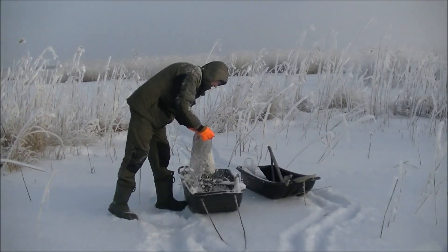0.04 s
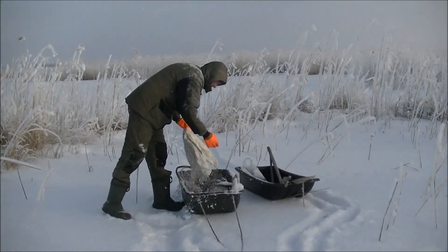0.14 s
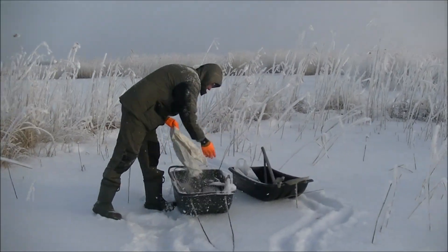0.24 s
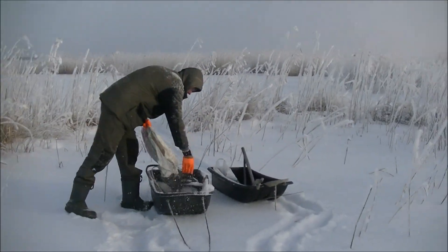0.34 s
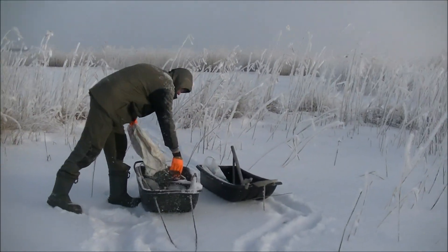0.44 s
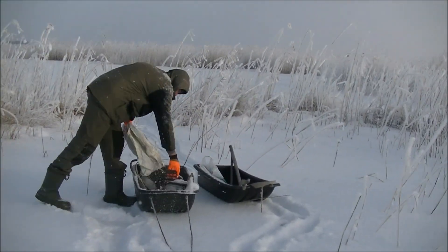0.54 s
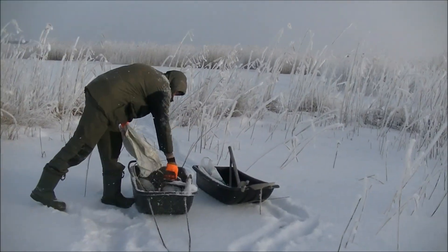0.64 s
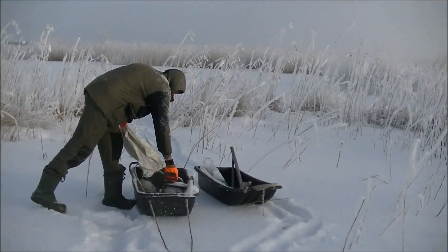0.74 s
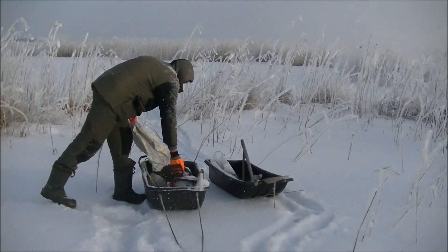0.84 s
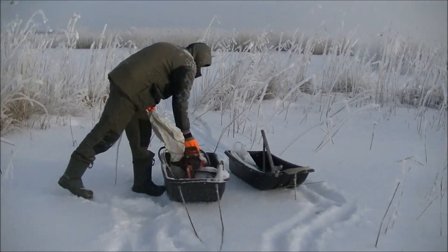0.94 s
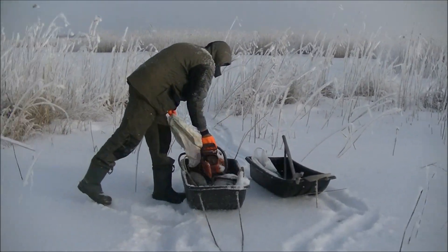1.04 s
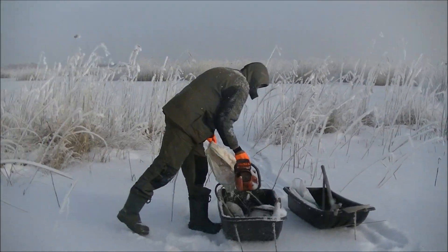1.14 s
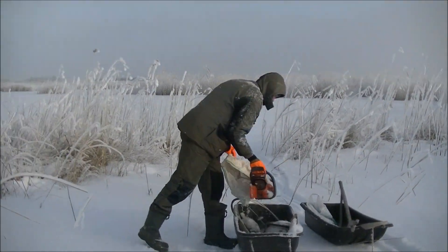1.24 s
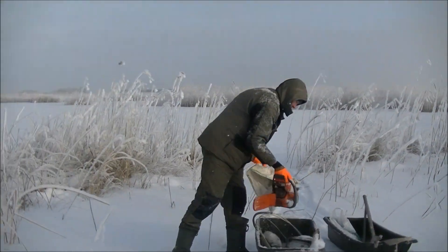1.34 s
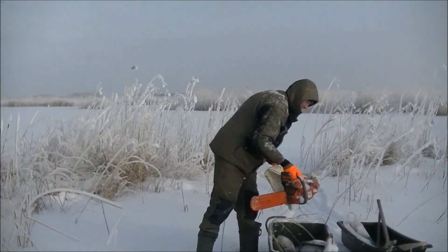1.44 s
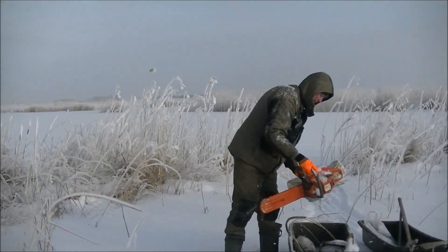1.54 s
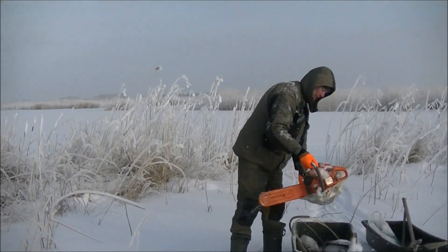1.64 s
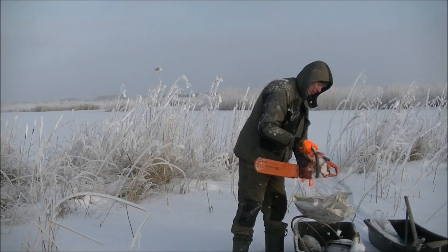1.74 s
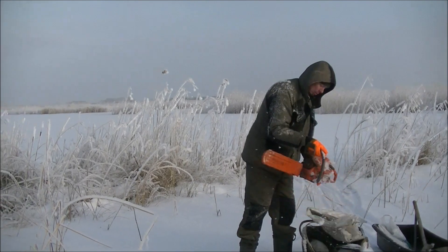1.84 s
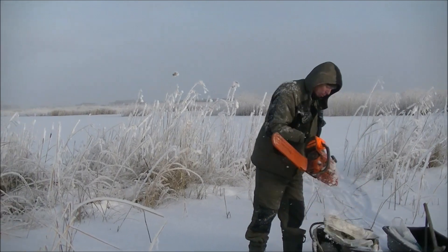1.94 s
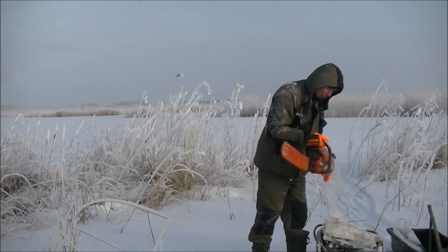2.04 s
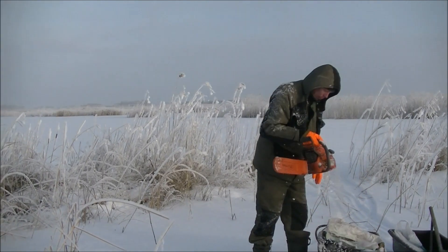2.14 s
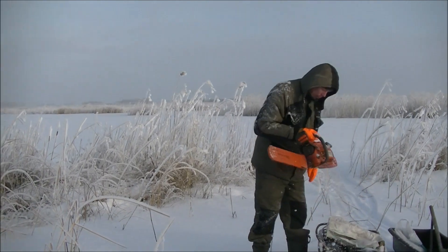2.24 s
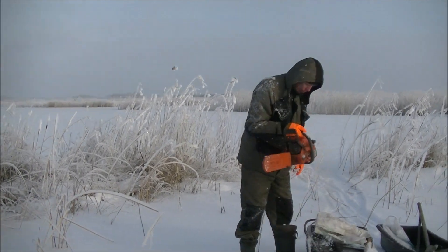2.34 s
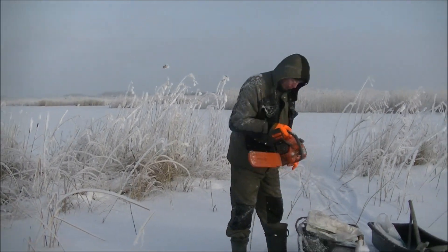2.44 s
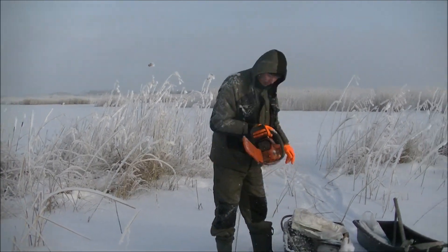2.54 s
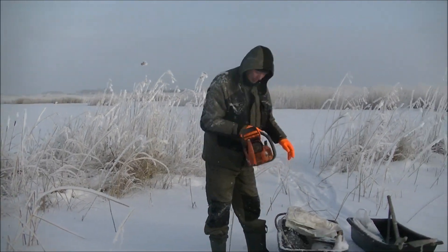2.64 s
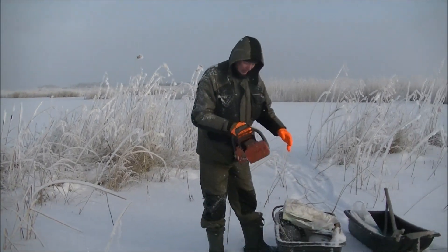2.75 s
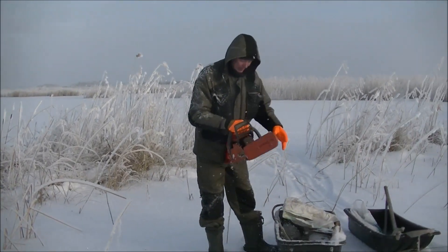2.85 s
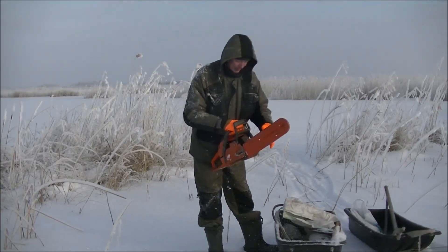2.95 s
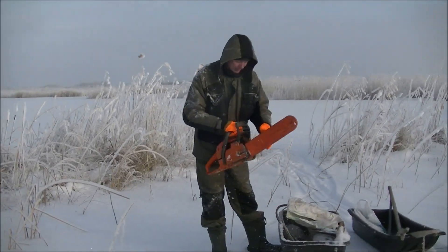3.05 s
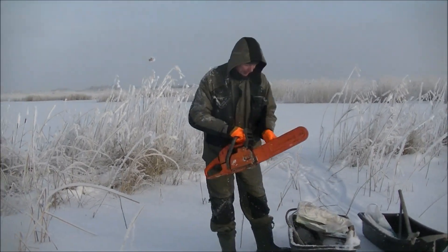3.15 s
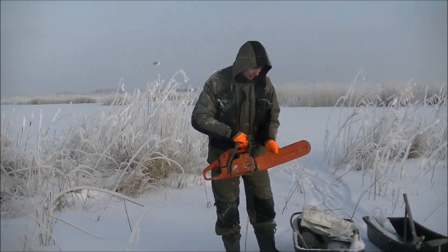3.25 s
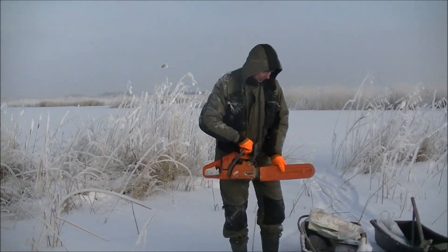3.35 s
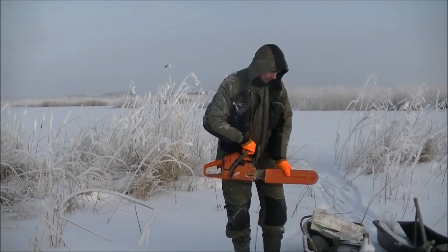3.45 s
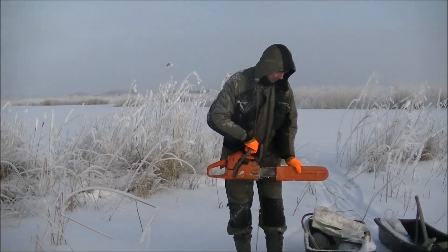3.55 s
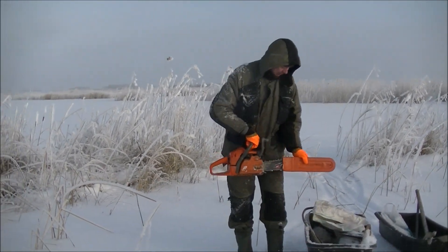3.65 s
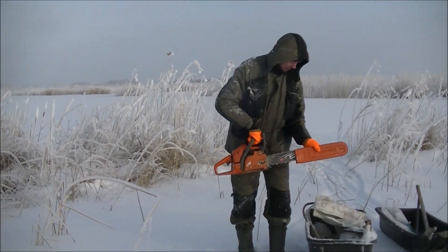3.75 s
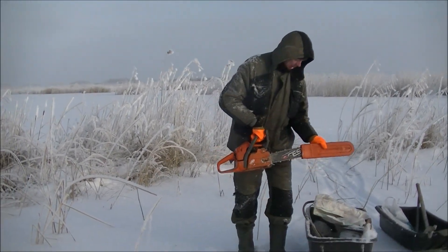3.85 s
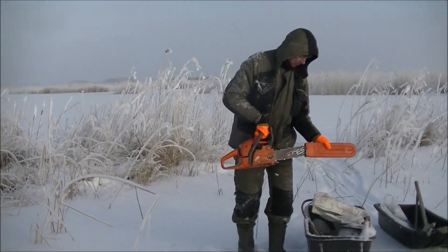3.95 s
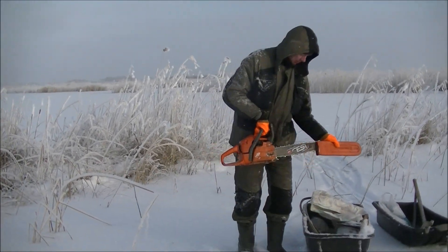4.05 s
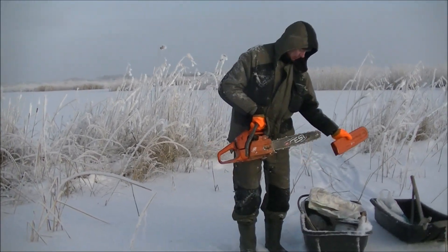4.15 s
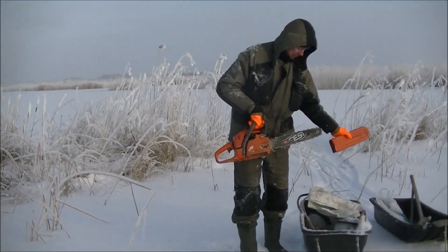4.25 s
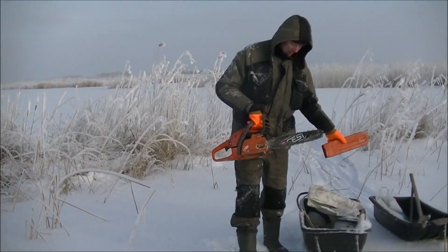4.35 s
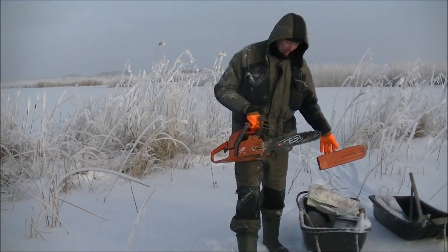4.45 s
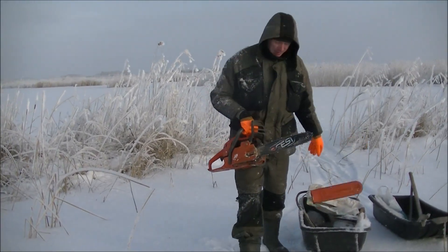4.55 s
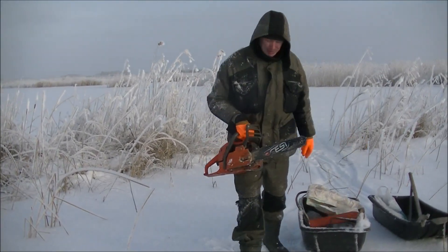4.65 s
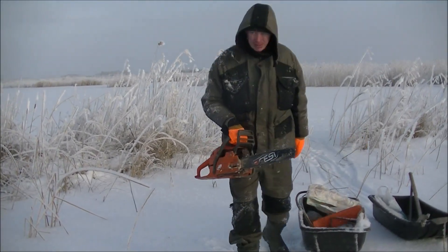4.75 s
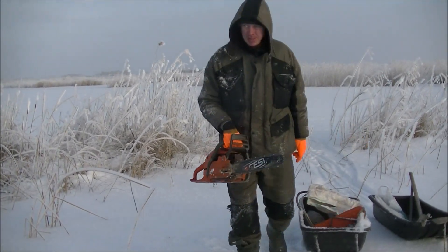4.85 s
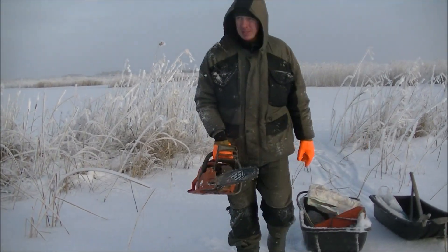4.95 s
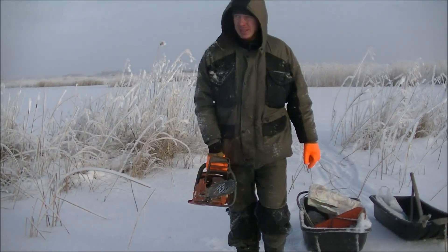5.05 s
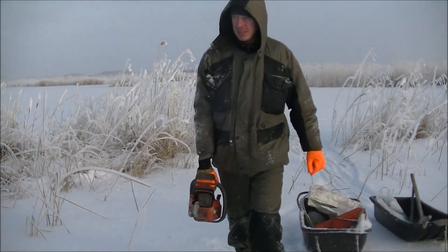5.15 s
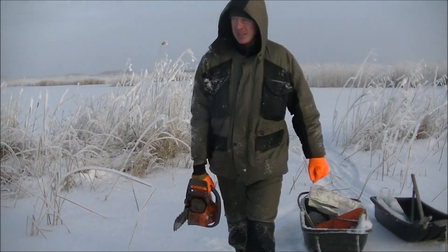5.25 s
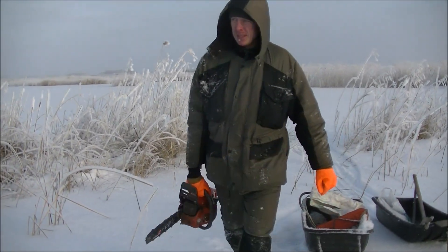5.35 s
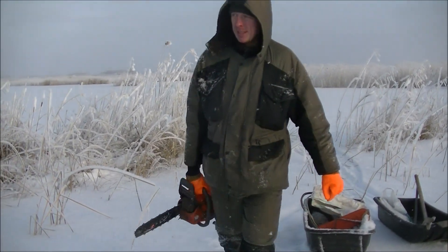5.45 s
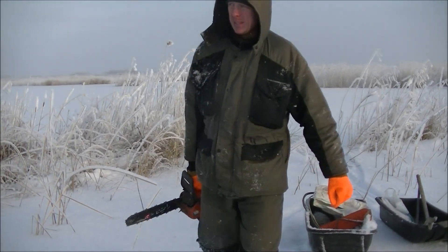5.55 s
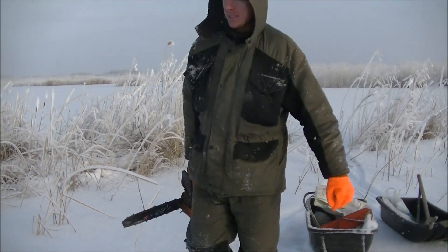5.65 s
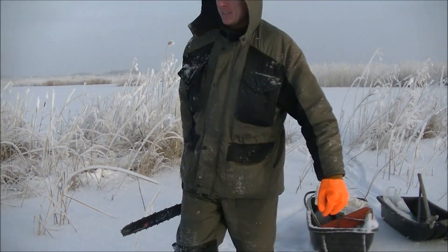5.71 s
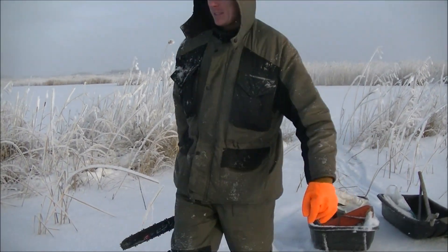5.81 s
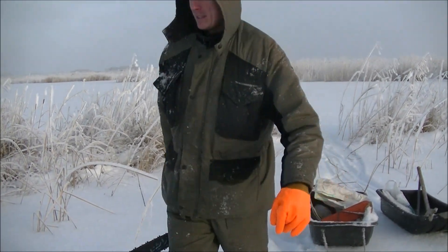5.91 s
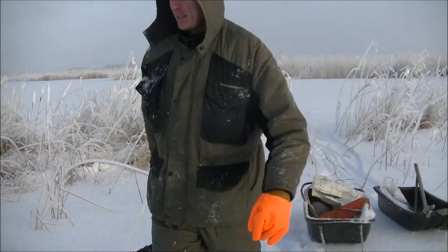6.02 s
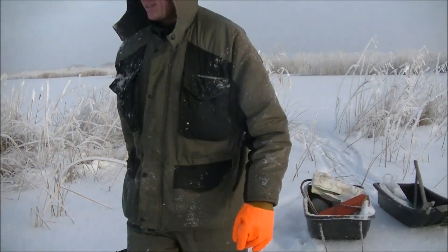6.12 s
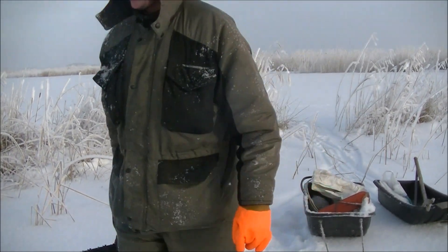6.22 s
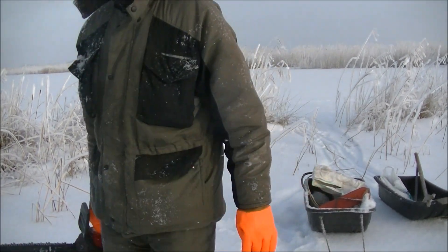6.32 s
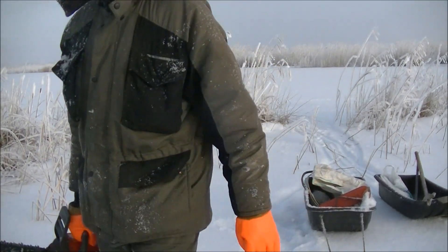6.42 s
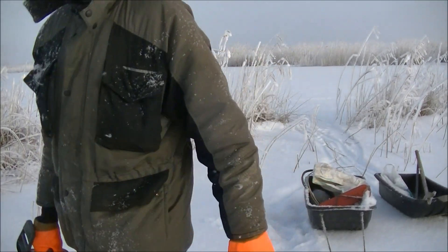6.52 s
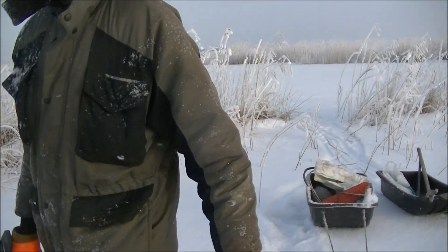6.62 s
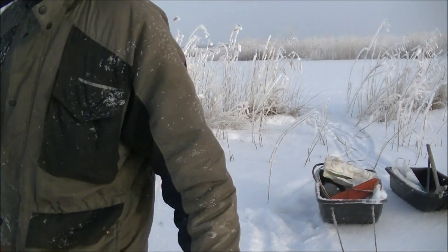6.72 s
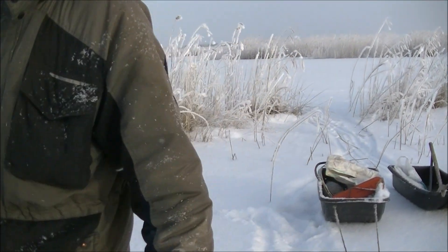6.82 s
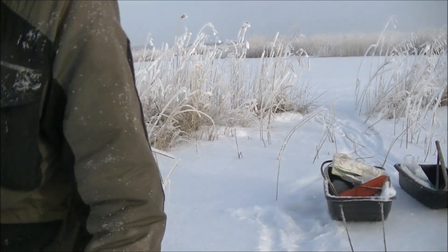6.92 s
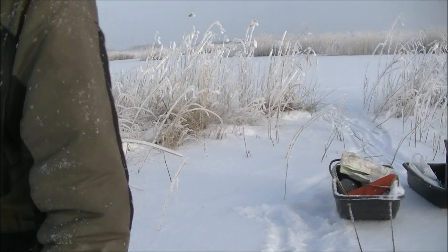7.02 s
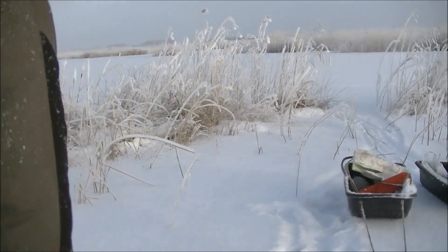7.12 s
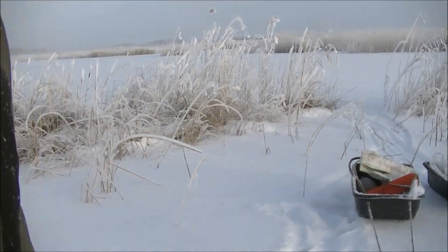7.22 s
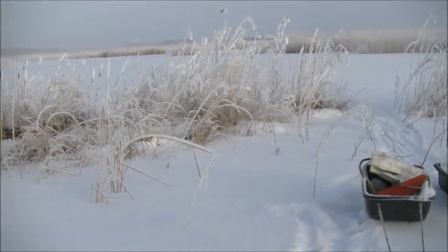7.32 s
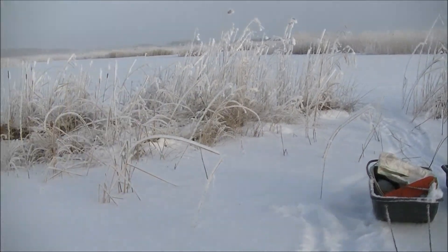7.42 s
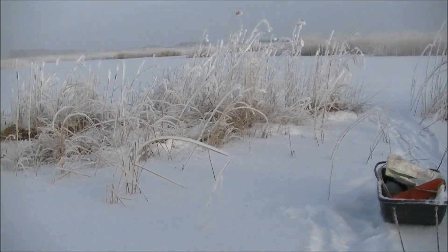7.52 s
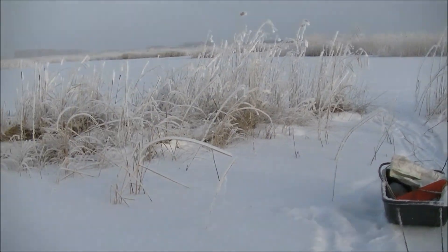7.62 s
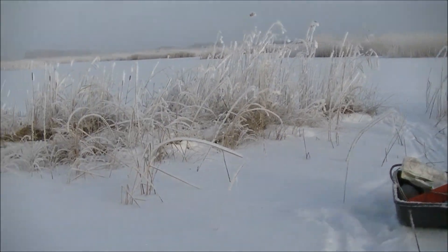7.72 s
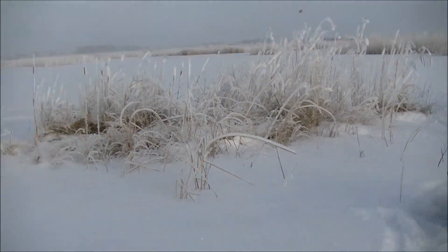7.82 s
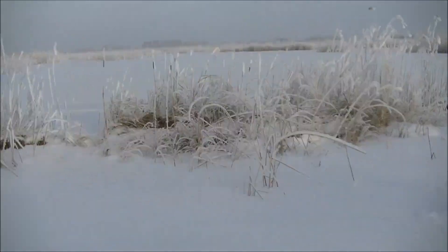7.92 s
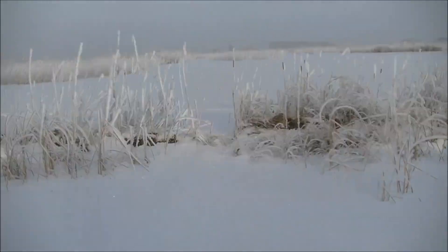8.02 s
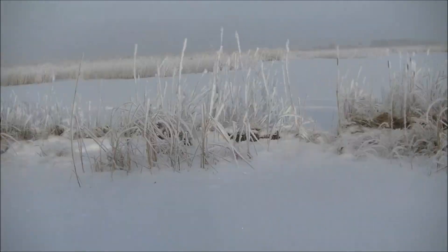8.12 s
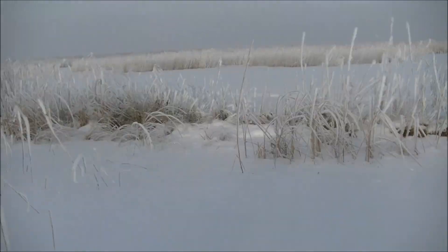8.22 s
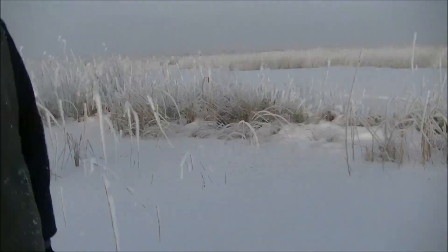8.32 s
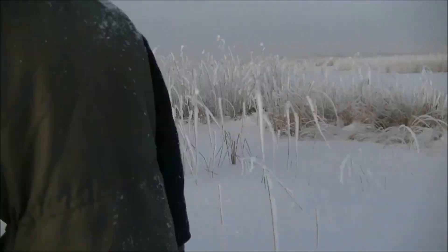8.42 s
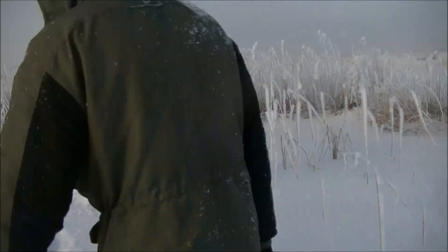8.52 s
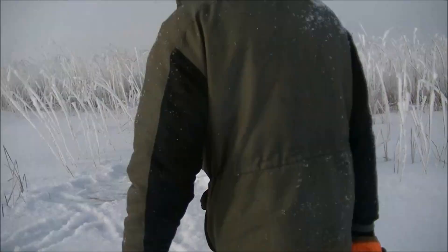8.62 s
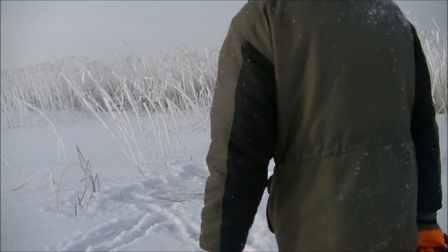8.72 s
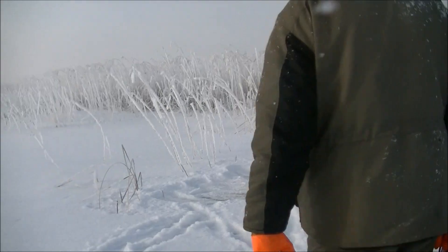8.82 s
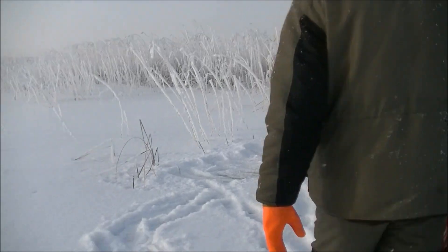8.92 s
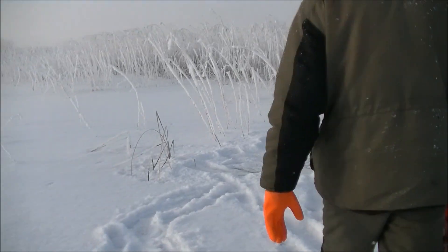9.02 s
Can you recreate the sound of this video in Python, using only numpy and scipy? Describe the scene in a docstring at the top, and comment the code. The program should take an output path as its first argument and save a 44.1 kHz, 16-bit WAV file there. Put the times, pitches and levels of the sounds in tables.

```python
"""Boots crunch in deep, cold snow while a stiff jacket and trousers swish. The man drags a chainsaw out
of a plastic sled, works the plastic sheath off its bar and tosses it back, then wades close past.
Each step crushes snow grains and gives way in a run of creaking slips; the cloth hisses as its threads
catch and let go. The plastic scrapes, clacks and booms, and the steel bar rings faintly once.
Behind it all is the faint hiss of a still marsh, where the open snow returns no echo."""
import sys
import numpy as np
from scipy import signal
from scipy.fft import rfft, irfft, next_fast_len
from scipy.io import wavfile
from scipy.ndimage import uniform_filter1d

SR = 44100
rng = np.random.default_rng(int(sys.argv[2]) if len(sys.argv) > 2 else 0)


def materialize(psi):
    """Save the field psi as 16-bit PCM at rate SR to the path in sys.argv[1].

    A 1-D psi becomes a single channel; in a 2-D psi each row is a channel.
    """
    bounded = np.clip(np.atleast_2d(psi).T, -1, 1)
    quanta = np.round(bounded * 32767).astype(np.int16)
    wavfile.write(sys.argv[1], SR, quanta)


N = 399987
TIME = np.arange(N) / SR

# A boot takes weight. Each row: start in seconds, length in seconds, snow level at full weight in dB,
# swell up to full weight in dB, cloth level in dB. Levels in all tables are relative.
STEPS = [(0.033, 0.511, -39.5, 10, -49.5), (0.782, 0.53, -41.5, 7, -50.5), (1.32, 0.408, -49, -2, -56),
         (1.728, 0.67, -52.5, -5, -70), (2.778, 0.41, -57, -6, -72), (3.288, 0.595, -52, 1, -58.5),
         (4.515, 0.45, -48.5, 1.5, -53.5), (4.979, 0.52, -42.5, 13, -50), (5.721, 0.44, -37.5, 21, -44),
         (6.297, 0.501, -38, 8, -44), (7.044, 0.4, -36, 13, -42), (7.65, 0.4, -35.5, 18, -42),
         (8.063, 0.65, -39.5, 10, -48.5), (8.965, 0.12, -32.5, 15, -38)]
# A leg or sleeve sweeps past the jacket. Each row: peak time, rise and fall in seconds, level in dB.
SWISHES = [(0.02, 0.27, 0.45, -50.5), (0.67, 0.63, 0.1, -56.5), (0.95, 0.28, 0.58, -46.5),
           (1.66, 0.16, 0.14, -45), (1.85, 0.15, 0.75, -57.5), (3.81, 0.102, 0.071, -50.5),
           (5.88, 0.063, 0.25, -43.5), (6.53, 0.022, 0.091, -43), (6.72, 0.12, 0.17, -41),
           (7.165, 0.055, 0.1, -38), (7.495, 0.026, 0.13, -53.5), (7.8, 0.036, 0.13, -39),
           (8.28, 0.18, 1, -43.5), (8.89, 0.064, 0.19, -52.5)]


def walking(full_weight_at=0.89, swell_curve=0.93, cloth_follows=0.99, swish_rasp_db=3.5):
    """Loudness of snow and cloth: each step swells under the weight, eases, and stops once packed."""
    snow_power, cloth_power = from_db(-57.5) ** 2, from_db(-64.5) ** 2  # he is never quite still
    for start, length, snow_db, swell_db, cloth_db in STEPS:
        sinking = stroke(start, start + length, rise_s=0.027, fall_s=0.026)
        from_full_weight = np.abs(1 - (TIME - start) / (full_weight_at * length))
        drop_db = swell_db * np.minimum(from_full_weight, 1) ** swell_curve
        snow_power += (sinking * from_db(snow_db - drop_db)) ** 2
        cloth_power += (sinking * from_db(cloth_db - cloth_follows * drop_db)) ** 2
    swish = strokes(SWISHES)
    rasp = from_db(swish_rasp_db) * swish  # the snow sound doubles as the coarse, low part of a swish
    return np.hypot(np.sqrt(snow_power), rasp), np.hypot(np.sqrt(cloth_power), swish)


# The tone of crushed snow. Each row: frequency in Hz, level in dB.
SNOW_TONE = [(50, -18.5), (200, -4.5), (720, 1.5), (1300, -2), (2200, 2.5), (3000, -2), (4000, 0.5),
             (5000, -6), (12000, -38.5)]


def crushed_snow(load, gain_db=-1.0, clump_db=1.5, jerks_per_s=32, grunt_db=-14.0):
    """Ice crystals break under the sole; the boot sinks in small uneven jerks, each with a dull grunt."""
    crystals = rms_one(colour(grains(per_s=14000, spread_db=3.5), SNOW_TONE))
    jerk_rate = jerks_per_s * np.exp(0.5 * drift(per_s=jerks_per_s))
    jerk_phase = np.cumsum(jerk_rate) / SR % 1  # runs from 0 to 1 between jerks
    grunts = rms_one(band(rng.standard_normal(N) * np.exp(-9.6 * jerk_phase), 516, 1280))
    weight = load * from_db(gain_db + clump_db * drift(per_s=110))
    return weight * (crystals + from_db(grunt_db) * grunts)


# The snow gives way under a boot. Each row: start in seconds, creak level in dB, crunch level in dB.
STRONG_SLIPS = [(0.032, -54, -47), (0.107, -49, -48), (0.159, -37.5, -42.5), (0.246, -42, -42.5),
                (0.488, -38, -47), (0.544, -44, -42.5), (0.786, -40.5, -42), (1.345, -40, -38.5),
                (1.417, -44, -44.5), (1.481, -46, -42.5), (1.563, -49, -46), (1.658, -43, -39.5),
                (2.772, -53.5, -49), (3.081, -46, -47.5), (3.15, -45.5, -49.5), (5.012, -43, -45.5),
                (5.062, -40, -46), (5.137, -47, -43.5), (5.273, -52, -39), (5.381, -37.5, -43.5),
                (5.543, -35.5, -41.5), (5.724, -43, -40.5), (5.812, -37.5, -40), (5.895, -40, -39),
                (5.973, -44.5, -35), (6.039, -42, -33.5), (6.139, -40, -51), (6.291, -43, -56),
                (6.335, -34.5, -42.5), (6.382, -37.5, -47), (6.49, -37.5, -40.5), (6.554, -38, -42),
                (6.599, -41, -41), (6.688, -34, -34.5), (6.725, -36, -37), (7.043, -42.5, -43.5),
                (7.094, -39.5, -39.5), (7.128, -39.5, -40), (7.196, -42, -34), (7.224, -42, -36),
                (7.267, -49, -32.5), (7.318, -37.5, -32), (7.612, -41.5, -44.5), (7.696, -41, -44.5),
                (7.736, -41.5, -38.5), (7.77, -49, -35.5), (7.854, -48, -37.5), (7.898, -48, -38),
                (8.079, -42, -44), (8.164, -44.5, -39.5), (8.263, -46, -45.5), (8.371, -41.5, -44),
                (8.43, -37.5, -34.5), (8.497, -48, -36.5), (8.532, -51, -39), (8.58, -50, -38.5)]


def slip_runs(gap_s=0.042, most_gaps=3, weaker_db=-5.5):
    """A boot breaks through in an even run: weaker slips fill in between strong ones that are close."""
    rows = list(STRONG_SLIPS)
    for this, following in zip(np.array(STRONG_SLIPS), np.array(STRONG_SLIPS[1:])):
        gaps = round((following[0] - this[0]) / gap_s)
        if gaps <= most_gaps:
            rows += [this + (following - this) * k / gaps + [0, weaker_db, weaker_db]
                     for k in range(1, gaps)]
    return rows


# The tone of a slip's crunch. Each row: frequency in Hz, level in dB.
CRUNCH_TONE = [(100, -17), (700, -5.5), (1400, 1), (2400, 0), (3000, -6.5), (4200, -3.5), (6000, -10),
               (15000, -17)]
# The thud of snow packing. Each row: time in seconds, level in dB against the slip's louder part.
PACKING_THUD = [(0.2, -6.5), (5.5, -18.5), (7.3, -16), (8.5, -6)]
CATCH_GAP_S = 0.00585


def snow_slips(catch_count=3, loss_db=5, rise_s=0.00095, creak_t60=0.014, crunch_t60=0.023):
    """Each slip is a stutter of gritty breaks; the packed layer adds a hollow pop and a dull thud."""
    out, t = np.zeros(N), TIME[:SR // 10]
    catch_number = np.arange(catch_count)[:, None]
    for start, creak_db, crunch_db in slip_runs():
        gaps = CATCH_GAP_S * rng.uniform(0.7, 1.3, catch_number.shape)
        age = np.maximum(t - (np.cumsum(gaps, axis=0) - gaps[0]), 0)
        catches = from_db(-loss_db * catch_number) * (1 - np.exp(-age / rise_s))
        pops = rng.standard_normal(len(t)) * np.sum(catches * fade(age, creak_t60), axis=0)
        grit = rng.standard_normal(len(t)) * np.sum(catches * fade(age, crunch_t60), axis=0)
        creak_hz = 880 * 2 ** (0.05 * (crunch_db - creak_db))  # a crisper slip creaks higher
        thud_db = max(creak_db, crunch_db) + np.interp(start, *np.transpose(PACKING_THUD))
        add(out, start, from_db(creak_db) * peak_one(resonate(pops, [(creak_hz, 310, 0)])))
        add(out, start, from_db(crunch_db) * peak_one(colour(grit, CRUNCH_TONE)))
        add(out, start, from_db(thud_db) * peak_one(band(pops, 215, 405)))
    return out


def snow_holding(dip_db=1.5, hold_s=0.03):
    """Just before each slip the snow bears the weight, so the crushing gets a little quieter."""
    held = np.zeros(N)
    for start, _, _ in slip_runs():
        add(held, start - hold_s, np.hanning(round((hold_s + CATCH_GAP_S) * SR)))
    return from_db(-dip_db * held)


# The tone of stiff cloth rubbing. Each row: frequency in Hz, level in dB.
CLOTH_TONE = [(60, -23), (280, -24), (1300, -14), (4300, 6.5), (5600, 3.5), (6700, 8.5), (8200, -1),
              (9300, 2.5), (10300, -0.5), (13000, 2.5), (16000, -5.5)]


def clothes(brushing, gain_db=2.5, flutter_db=1.4):
    """Countless threads of stiff cloth catch and let go: a bright, slightly fluttering swish."""
    mid, side = (rms_one(colour(grains(per_s=30000, spread_db=-1.0), CLOTH_TONE)) for _ in range(2))
    flutter = from_db(gain_db + flutter_db * drift(per_s=87))
    return brushing * flutter * widen(mid, band(side, 5300, 5900, order=1), side_db=0.5)


# Cloth squeaks. Each row: start and length in seconds, first and last pitch in Hz, level in dB.
SQUEAKS = [(2.247, 0.032, 2720, 3050, -41), (2.324, 0.055, 3500, 3760, -44),
           (8.845, 0.071, 2990, 4230, -37.5), (8.856, 0.04, 1847, 2280, -42),
           (8.887, 0.0556, 2500, 2330, -37.5)]


def sleeve_squeaks(roughness_hz=340):
    """Ribbed cloth sliding on itself chirps roughly, its pitch following the speed of the arm."""
    out = np.zeros(N)
    for start, length, first_hz, last_hz, db in SQUEAKS:
        size = round(length * SR)
        ribs = np.sin(2 * np.pi * np.cumsum(np.linspace(first_hz, last_hz, size)) / SR)
        grip = band(rng.standard_normal(SR // 10), 20.0, roughness_hz)[:size]
        add(out, start, from_db(db) * peak_one(ribs * grip * np.hanning(size)))
    return out


# A high sheen on the walker's sound, and a lower rasp that comes up as he brushes past.
# Each row: time in seconds, frequency in Hz, level in dB.
SHEEN = [(0, 5010, 1), (1.6, 5000, 3.5), (2.2, 4900, -18), (6.8, 4730, -23), (7.15, 4820, 1.5),
         (7.9, 4840, 7), (8.4, 5030, -0.5), (9.07, 5015, 10)]
RASP = [(0, 4000, -21), (6.2, 3800, -3), (6.7, 2530, -9), (8.1, 2370, -6), (8.55, 3586, -6)]


def shifting_resonances(walker, sheen_width_hz=300, rasp_width_hz=420):
    """Two narrow bands of the walker's sound glide and swell as he moves."""
    out = 0
    for curve, width_hz in ((SHEEN, sheen_width_hz), (RASP, rasp_width_hz)):
        times, hz, db = np.transpose(curve)
        ringing = moving_resonance(walker, np.interp(TIME, times, hz), width_hz)
        out += from_db(np.interp(TIME, times, db)) * ringing
    return out


# How the gear rings: the plastic wall, a hard click of the steel bar, and the hollow sheath and sled. # Each
# row: frequency in Hz, width in Hz, level in dB.
PLASTIC_MODES = [(537, 100, -3.5), (750, 36, -2.5), (950, 130, -2), (2020, 227, 5), (2520, 620, -5),
                 (3394, 270, 3), (3830, 820, 0.5)]
SNAP_MODES = [(1835, 110, -5), (2790, 100, -6), (4040, 250, 1.5)]
HOLLOW_MODES = [(280, 130, -11), (682, 130, 4.5), (975, 200, 5)]
# Saw, sheath and sled knock together; the row at 2.452 s is a glove creaking as he handles them. # Each row:
# start in seconds, clack, hollow and tick levels in dB.
KNOCKS = [(0.9667, -14.5, -22, -43), (1.0214, -18, -28, -53), (1.1816, -16, -21, -46),
          (1.19, -21.5, -21, -46), (1.98, -22, -28.5, -34), (2.009, -44, -30.5, -49),
          (2.25, -29, -39.5, -69), (2.452, -41, -38.5, -57), (2.512, -28, -33.5, -70),
          (2.533, -36, -39, -69), (2.6375, -27.5, -28.5, -48), (2.68, -26, -55.5, -43.5),
          (3.4473, -19.5, -25.5, -28.5), (3.4774, -37.5, -41, -32.5), (3.6244, -16, -25.5, -38.5),
          (4.046, -20, -19.5, -52), (4.096, -7.5, -30, -23), (4.28, -42, -47, -52),
          (4.398, -32.5, -43, -48.5), (4.577, -34, -47, -46), (4.693, -8.5, -11.5, -49),
          (4.7022, -7, -7.5, -24), (4.8411, -35, -19.5, -36.5), (4.885, -24.5, -23.5, -46),
          (4.935, -46, -28.5, -59), (4.954, -50, -34, -47.5), (8.9457, -25, -28, -53)]


def knocks(rise_s=0.00013, crack_s=0.00046, ring_db=9.0, spread_db=7.5):
    """A hard hit and a dying chatter: a bright tick and snap, the wall's clack, the hollow body's note."""
    out, t = np.zeros(N), TIME[:SR // 6]

    def contact(t60):
        force = (1 - np.exp(-t / rise_s)) * (3.0 * np.exp(-t / crack_s) + fade(t, t60))
        return rng.standard_normal(len(t)) * force

    for start, clack_db, hollow_db, tick_db in KNOCKS:
        blow = contact(t60=0.054)
        # each spot that is hit brings out different notes
        modes = [(hz, width, db + spread_db * rng.standard_normal()) for hz, width, db in PLASTIC_MODES]
        wall = band(blow + from_db(ring_db) * resonate(blow, modes), 1430, 4700)
        add(out, start, from_db(clack_db - 8.0) * peak_one(wall))
        add(out, start, from_db(tick_db) * peak_one(band(contact(t60=0.031), 2500, 10100)))
        add(out, start, from_db(tick_db + 7.5) * peak_one(resonate(contact(t60=0.031), SNAP_MODES)))
        add(out, start, from_db(hollow_db - 9.5) * peak_one(resonate(contact(t60=0.075), HOLLOW_MODES)))
    return out


# Gear skids over the sled. Each row: peak time, rise and fall in seconds, scrape and rumble levels in dB.
SKIDS = [(0.89, 0.027, 0.13, -36, -52), (0.955, 0.098, 0.16, -36, -40.5), (1.025, 0.11, 0.059, -27.5, -40),
         (1.095, 0.095, 0.082, -30, -36.5), (1.2, 0.046, 0.08, -41, -39.5),
         (4.705, 0.0063, 0.064, -26.5, -37.5), (4.76, 0.13, 0.08, -40, -43.5), (4.9, 0.174, 0.13, -52, -47)]
# The bar slides in its sheath. Each row: peak time, rise and fall in seconds, level in dB.
PULLS = [(3.42, 0.106, 0.21, -38), (3.625, 0.0694, 0.062, -30), (3.79, 0.065, 0.1, -30.5),
         (3.94, 0.014, 0.0135, -40.5), (4.05, 0.034, 0.044, -26), (4.095, 0.035, 0.02, -27)]
# The air in the sheath hums as the bar works loose. One row, laid out like a pull.
LOOSENING = (3.5, 0.03, 0.02, -34)


def scraping(judder_db=2.5, rasp_db=-8.5, sheath_hz=935, sheath_width_hz=83):
    """Sticking and slipping rings the plastic over a dry rasp; air in the sheath adds a hollow note."""
    catches = grains(per_s=3600, spread_db=1.5) * from_db(judder_db * drift(per_s=190))
    scrape = resonate(catches, PLASTIC_MODES) + from_db(rasp_db) * band(catches, 430, 4170, order=3)
    hum = resonate(catches, [(sheath_hz, sheath_width_hz, -5)])
    skidding = strokes([(peak, rise, fall, db) for peak, rise, fall, db, _ in SKIDS])
    return (skidding * rms_one(scrape)
            + strokes(PULLS) * rms_one(scrape + hum)
            + strokes([LOOSENING]) * rms_one(hum))


# The low notes of the sled's walls. Each row: frequency in Hz, width in Hz, level in dB.
SLED_MODES = [(118.3, 60, -11), (204, 41, 3), (240.5, 53, 0), (328, 52, -3.5)]


def sled_rumble():
    """The wide walls of the sled boom as the load skids over them."""
    shifting = strokes([(peak, rise, fall, db) for peak, rise, fall, _, db in SKIDS])
    return shifting * rms_one(resonate(grains(per_s=1000, spread_db=-1.0), SLED_MODES))


# The notes of the saw's steel bar. Each row: frequency in Hz, level in dB, seconds to fade by 60 dB.
BAR_MODES = [(2370, -9, 0.47), (3950, 10, 0.094)]
# A jolt to the bar. Each row: start in seconds, level in dB.
BAR_JOLTS = [(4.0953, -40)]


def bar_ring():
    """The jolted steel bar rings with two thin, dying notes."""
    out, t = np.zeros(N), TIME[:SR]
    ring = sum(from_db(db) * fade(t, t60) * np.sin(2 * np.pi * hz * t) for hz, db, t60 in BAR_MODES)
    for start, db in BAR_JOLTS:
        add(out, start, from_db(db) * ring)
    return out


# The tone of the air. Each row: frequency in Hz, level in dB.
AIR_TONE = [(25, -14), (100, 4), (400, 8), (1100, -6.5), (2100, -6.5), (4300, -3), (16000, -16)]


def still_air(gain_db=-62.5):
    """The faint, even hiss of a windless day; its low part is alike in both ears."""
    mid, side = (rms_one(colour(rng.standard_normal(N), AIR_TONE)) for _ in range(2))
    return from_db(gain_db) * widen(mid, 0.17 * side + band(side, 1200, 13000, order=1), side_db=3.5)


def from_db(db):
    """Turn decibels into a gain to multiply by."""
    return 10 ** (np.asarray(db) / 20)


def fade(t, t60):
    """A gain that drops by 60 dB every t60 seconds."""
    return from_db(-60 * t / t60)


def rms_one(x):
    """Scale to an average (rms) level of one."""
    return x / np.sqrt(np.mean(x ** 2) + 1e-20)


def peak_one(x):
    """Scale so that the loudest four milliseconds have a level of one."""
    return x / np.sqrt(uniform_filter1d(x ** 2, size=176).max() + 1e-20)


def at_hz(points, hz):
    """Read between a table's rows on a log-frequency scale."""
    frequencies, values = np.transpose(points)
    return np.interp(np.log(hz + 1), np.log(frequencies), values)


def colour(x, tone, size=4096):
    """Give a sound the tone in a table, with no ringing ahead of it (minimum phase)."""
    gains = from_db(at_hz(tone, np.fft.rfftfreq(size, 1 / SR)))
    cepstrum = irfft(np.log(gains))
    cepstrum[1:size // 2] *= 2
    cepstrum[size // 2 + 1:] = 0
    return signal.oaconvolve(x, irfft(np.exp(rfft(cepstrum))))[:len(x)]


def band(x, low_hz, high_hz, order=2):
    """Keep what lies between two frequencies."""
    return signal.sosfilt(signal.butter(order, [low_hz, high_hz], "band", fs=SR, output="sos"), x)


def resonate(x, modes):
    """Let a sound ring at each mode, and add the results with alternating signs."""
    out = 0
    for k, (hz, width, db) in enumerate(modes):
        r = np.exp(-np.pi * width / SR)
        ringing = signal.lfilter([1, 0, -1], [1, -2 * r * np.cos(2 * np.pi * hz / SR), r * r], x)
        out += (-1) ** k * from_db(db) * (1 - r * r) / 2 * ringing
    return out


def moving_resonance(x, hz, width_hz):
    """Let a sound ring at one gliding frequency."""
    turn = np.exp(2j * np.pi * np.cumsum(hz) / SR)
    r = np.exp(-np.pi * width_hz / SR)
    return 2 * np.real(turn * signal.lfilter([1 - r], [1, -r], x / turn))


def drift(per_s):
    """A smooth random wander with a typical size of one."""
    knots = rng.standard_normal(8192)
    return rms_one(np.interp(TIME * per_s, np.arange(len(knots)), knots))


def grains(per_s, spread_db):
    """Tiny clicks of random size at random times."""
    sizes = from_db(spread_db * np.minimum(rng.exponential(1, N), 4)) * rng.choice([-1, 1], N)
    return rms_one(sizes * (rng.random(N) < per_s / SR)) + 1e-18


def stroke(start, end, rise_s, fall_s):
    """A gain that is one from start to end, and 20 dB down rise_s before and fall_s after."""
    outside = np.maximum((start - TIME) / rise_s, (TIME - end) / fall_s)
    return from_db(-20 * np.clip(outside, 0, 10))


def strokes(rows):
    """The combined gain of several movements that each rise to a peak and fall."""
    return np.sqrt(sum((from_db(db) * stroke(peak, peak, rise, fall)) ** 2
                       for peak, rise, fall, db in rows))


def add(track, start_s, sound):
    """Mix a sound into a track."""
    start = max(0, round(start_s * SR))
    track[start:start + len(sound)] += sound[:max(0, N - start)]


def widen(mid, side, side_db):
    """Spread a sound out: add the side signal on the left, subtract it on the right."""
    return mid + from_db(side_db) * side * np.array([[1], [-1]])


def scene():
    """Mix the walker, his gear and the air."""
    load, brushing = walking()
    walker = clothes(brushing) + sleeve_squeaks() + crushed_snow(load * snow_holding()) + snow_slips()
    walker += shifting_resonances(walker)
    gear = scraping() + sled_rumble() + knocks() + bar_ring()
    return walker + gear + still_air()


# Timing between the sides. Each row: frequency in Hz, how far the left leads in radians.
LEFT_LEAD = [(300, -0.15), (2500, 0.45), (4600, 0), (5500, -1.93), (6400, 1.1), (10000, 0.5)]
# Balance between the sides. Each row: frequency in Hz, left minus right in dB.
BALANCE = [(300, 0), (1200, 2.3), (3000, 1), (8000, -1), (12000, 0)]


def record(dry, cutoff_hz=15950):
    """Two close microphones each get their own phase and level; the highest treble is cut steeply."""
    size = next_fast_len(N + 4096)
    hz = np.fft.rfftfreq(size, 1 / SR)
    half = np.array([[0.5], [-0.5]])
    response = from_db(half * at_hz(BALANCE, hz)) * np.exp(1j * half * at_hz(LEFT_LEAD, hz))
    heard = irfft(rfft(dry, size) * response, size)[:, :N]
    return signal.sosfilt(signal.ellip(12, 0.1, 80, cutoff_hz, fs=SR, output="sos"), heard)


dry = scene()
out = record(dry)
materialize(out)
```